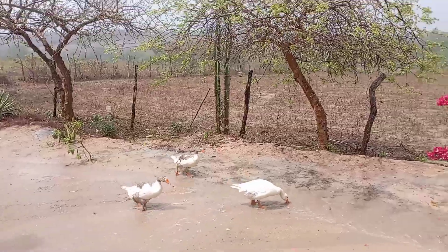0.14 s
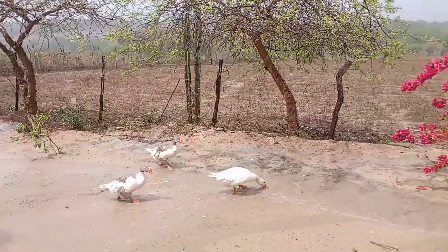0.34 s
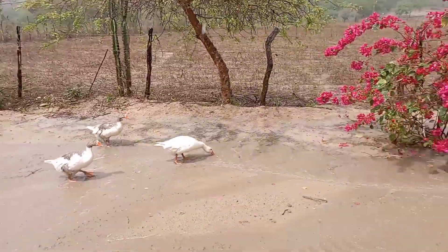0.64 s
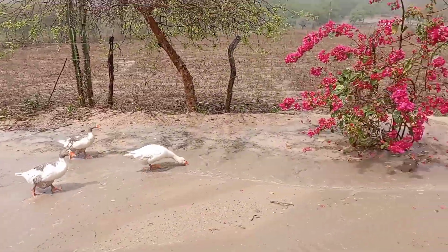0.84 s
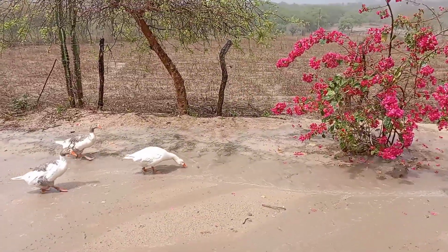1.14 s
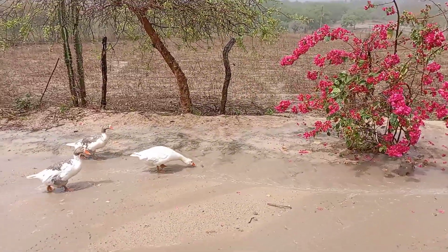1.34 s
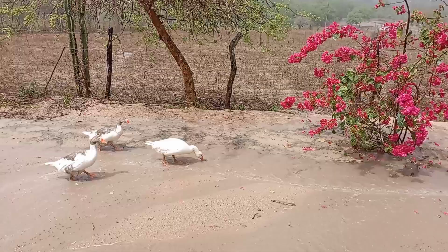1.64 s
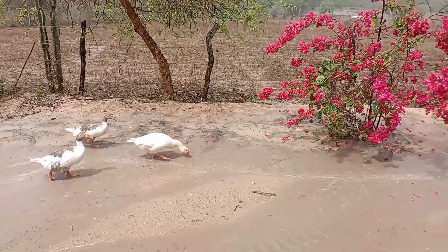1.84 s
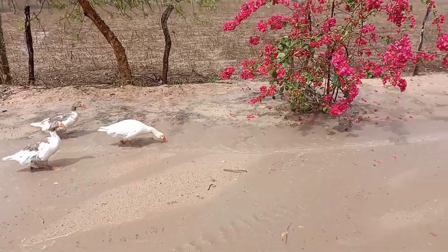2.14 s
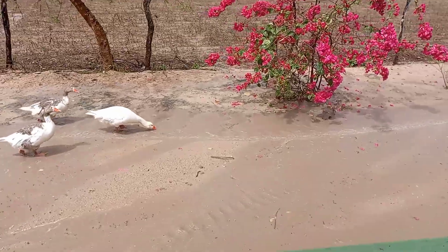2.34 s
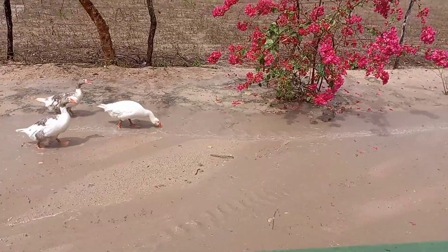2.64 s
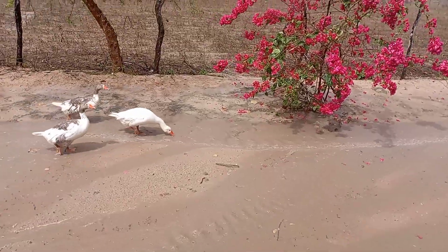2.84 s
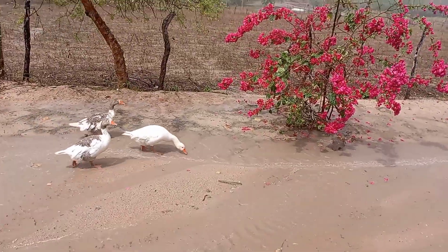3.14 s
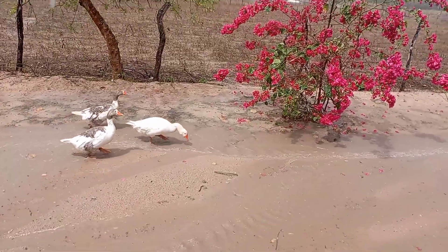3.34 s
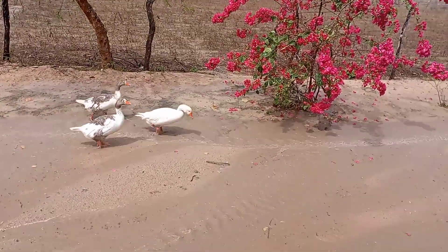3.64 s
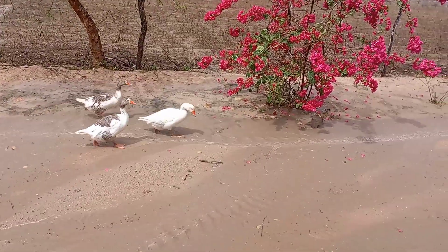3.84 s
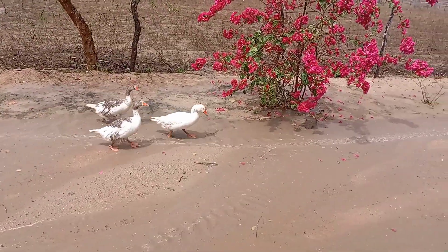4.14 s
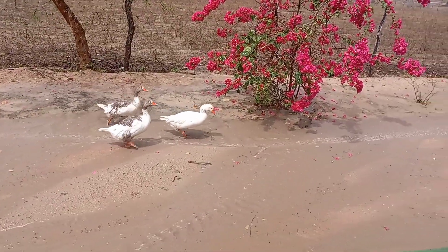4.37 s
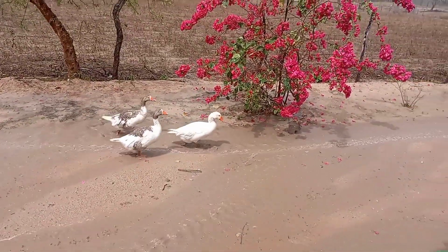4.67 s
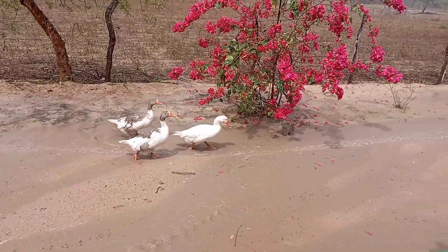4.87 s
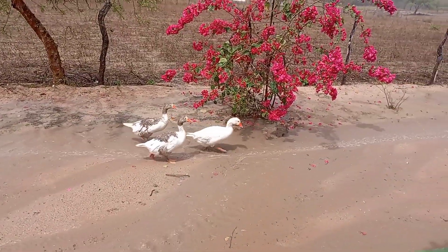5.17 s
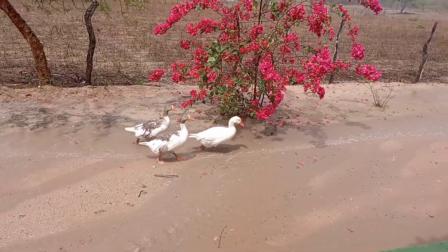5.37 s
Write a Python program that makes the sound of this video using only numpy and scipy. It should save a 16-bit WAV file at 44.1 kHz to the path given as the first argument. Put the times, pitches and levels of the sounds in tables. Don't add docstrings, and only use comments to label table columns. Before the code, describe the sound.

Fine, bright rain patter runs throughout, dotted with sharp ticks and little watery splashes. Beneath it lies a dull distant rumble and a slow engine putter that nearly sinks away, then quickens, grows barky and rough, swells to a peak past the middle, falls back and steadies. Thin bird whistles chirp briefly early on. Open outdoor space, stereo microphone, faint wall echoes on the engine.

```python
import sys
import numpy as np
from scipy import signal
from scipy.fft import rfft, irfft
from scipy.io import wavfile
from scipy.ndimage import uniform_filter1d

SR = 44100
rng = np.random.default_rng(int(sys.argv[2]) if len(sys.argv) > 2 else 0)


def waveform_to_disk(signal):
    frames = np.transpose(np.atleast_2d(signal))
    scaled = np.clip(frames, -1, 1) * 32767
    samples = np.round(scaled).astype(np.int16)
    wavfile.write(sys.argv[1], SR, samples)


def to_linear_factor(level_db):
    exponent = np.asarray(level_db, float) / 20
    return 10 ** exponent


N = 242991
TIME = np.arange(N) / SR
BINS = np.maximum(np.fft.rfftfreq(N, 1 / SR), 1)


def in_time(rows, s):
    at, *columns = np.transpose(rows)
    return [np.interp(s, at, c) for c in columns]


def at_hz(points, hz):
    point_hz, point_db = np.transpose(points)
    return np.interp(np.log(hz), np.log(point_hz), point_db)


def rms_one(x):
    return x / np.sqrt(np.mean(x ** 2) + 1e-20)


def drift(rate_hz):
    r = np.exp(-80 * np.pi * rate_hz / SR)
    noise = rng.standard_normal(N // 40 + 2002)
    slow = signal.lfilter([1], [1, -2 * r, r * r], noise)[2000:]
    return np.interp(np.arange(N) / 40, np.arange(len(slow)), rms_one(slow))


def add(track, s, grain):
    i = round(s * SR)
    part = grain[max(-i, 0):max(N - i, 0)]
    start = max(i, 0)
    track[start:start + len(part)] += part


def band(x, hz, octaves):
    edges_hz = np.clip(hz * 2.0 ** (np.array([-.5, .5]) * octaves), 20, .45 * SR)
    return signal.sosfilt(signal.butter(2, edges_hz, "band", fs=SR, output="sos"), x)


# (frequency [Hz], density [dB per Hz])
RUMBLE_SPECTRUM = [(25, -19), (45, -4), (70, 4), (110, 10.5), (200, -0.5), (350, 2), (500, -7.5),
                   (900, -41), (1500, -56)]


def far_rumble():
    mid, side = rfft(rng.standard_normal((2, N))) * to_linear_factor(at_hz(RUMBLE_SPECTRUM, BINS))
    apart = np.clip(BINS / 700, .6, 1)
    both = irfft(np.array([mid + apart * side, mid - apart * side]), N)
    return to_linear_factor(-47.5 + 1.55 * drift(0.92)) * rms_one(both)


# (time [s], level [dB])
RAIN_LEVEL = [(0, -42), (.47, -41.5), (.8, -43), (4.8, -42.5), (5.3, -41.5), (5.51, -42)]
# (frequency [Hz], density [dB per Hz])
HISS_SPECTRUM = [(290, -44), (500, -4.5), (740, -2.5), (1360, -5), (1640, -3.5), (2190, -2.5), (2610, -1.5),
                 (3750, -4), (5800, -0.5), (9630, 3), (12100, -4.5), (15100, -7.5), (16000, -20)]


def rain(patchy_db, grain_db, grain_share, per_s):
    size = to_linear_factor(grain_db * np.minimum(rng.exponential(1, N), 5)) * rng.choice([-1, 1], N)
    landed = rng.random(N) < per_s * to_linear_factor(5.0 * drift(18)) / SR
    ticks = rms_one(size * landed)
    ticks = np.array([ticks, np.roll(ticks, 11)])
    share = np.clip(grain_share, 0, 1)
    source = rfft(np.sqrt(1 - share) * rng.standard_normal((2, N)) + np.sqrt(share) * ticks)
    source = source * to_linear_factor(at_hz(HISS_SPECTRUM, BINS)) * (BINS > 300)
    together = 0.19 * drift(28.0) + 0.19 * drift(56)
    octave = np.log2(BINS / 250)
    out = 0
    for k in range(13):
        mask = np.cos(np.pi / 2 * np.clip(2 * octave - k, -1, 1)) ** 2
        own = 0.33 * drift(3.8) + 0.62 * drift(25.5)
        flicker_db = patchy_db * min(k / 9, 1) * (together + own)
        out = out + to_linear_factor(flicker_db) * irfft(source * mask, N)
    return to_linear_factor(in_time(RAIN_LEVEL, TIME)[0]) * rms_one(out)


# (time [s], peak [dB], centre [Hz])
SAND_DROPS = [(0.3327, -28, 8460), (.94, -32, 9300), (1.133, -30, 8650), (1.2927, -29, 8400),
              (1.5594, -32.5, 6140), (1.989, -38, 5750), (2.2468, -28, 8230), (2.383, -31.5, 7500),
              (2.428, -29, 10100), (2.4564, -33, 7700), (2.825, -33, 5600), (2.8395, -33, 6950),
              (2.9921, -36, 7710), (3.2398, -31.5, 6330), (3.27, -22, 7560), (3.5568, -35, 8350),
              (3.6706, -38.5, 5240), (3.8873, -25, 8800), (4.0002, -31, 5160), (4.2197, -35, 9400),
              (4.388, -31.5, 8600), (4.7007, -41, 9500), (4.765, -30, 9100), (5.151, -31, 8880),
              (5.2091, -34, 10200)]
# (time [s], peak [dB], centre [Hz], t60 [s])
WATER_SPATTERS = [(.3895, -29.5, 8250, 0.25), (.5013, -35, 8500, 0.23), (.7096, -32.5, 9800, .16),
                  (.8155, -34.5, 7400, .05), (.8594, -32, 9400, .062), (.9112, -35, 9100, .085),
                  (1.2448, -32.5, 10100, .14), (1.8632, -31.5, 6800, .051), (2.0764, -35.5, 9000, .19),
                  (2.6527, -32.5, 5500, 0.11), (2.7918, -33, 5800, 0.064), (2.9346, -37, 8200, 0.13),
                  (3.1015, -32, 5830, 0.11), (3.4176, -39, 6000, .057), (3.7528, -34, 6500, .19),
                  (3.9754, -39, 5500, 0.11), (5.0828, -34, 9800, 0.055), (5.3671, -36, 2960, 0.096)]
# (time [s], peak [dB], centre [Hz], t60 [s])
PUDDLE_SPLASHES = [(.4446, -40.5, 2470, 0.063), (.9095, -39.5, 4230, .18), (1.9478, -43, 2420, 0.14),
                   (2.1838, -47, 3340, .12), (2.6834, -41, 4000, .099), (3.006, -38.5, 2900, .08),
                   (3.081, -41.5, 3270, 0.21), (4.315, -41, 1940, 0.22), (4.3401, -41.5, 1950, 0.29),
                   (4.4918, -42, 3370, .078), (4.796, -41.5, 4700, 0.17), (4.979, -48, 3830, .12),
                   (5.1482, -35.5, 4270, 0.15), (5.2101, -40, 2960, .069), (5.3886, -41.5, 1340, 0.14)]


def drops(table, octaves, swell_s, spray_db):
    out = np.zeros((2, N))
    t = np.arange(int(.15 * SR)) / SR
    for s, db, hz, t60_s in table:
        noise, luck = rng.standard_normal((3, len(t))), rng.random(len(t))
        tick = noise[0] * t * to_linear_factor(-60 * t / .006)
        tick = band(band(tick, hz, 1.1), hz, 1.1)
        tick = tick / np.abs(tick).max()
        bursts = uniform_filter1d(1. * (luck < .004), size=40) * 40
        droplets = (.3 * noise[0] + noise[1:]) * (.6 + .9 * bursts)
        shape = (1 - np.exp(-t / swell_s)) * to_linear_factor(-60 * t / np.clip(1.62 * t60_s, .05, .35))
        spray = rms_one(band(droplets, hz, octaves)) * shape / shape.max() / 3
        for side, late_s in enumerate([0, .00025]):
            add(out[side], s + late_s, to_linear_factor(db + 3.5) * (tick + to_linear_factor(spray_db) * spray[side]))
    return out


# (time [s], length [s], start [Hz], end [Hz], level [dB])
BIRD_SQUEAKS = [
    (1.355, 0.032, 5280, 5250, -36.5),
    (1.41, .02, 5850, 5500, -41),
    (1.417, 0.052, 5480, 5470, -38.5),
    (1.468, .05, 5700, 5480, -43),
    (1.535, 0.069, 5800, 5460, -37),
    (1.6, .02, 5650, 5800, -58),
    (1.666, 0.067, 5750, 5900, -41),
    (1.77, 0.068, 5850, 5700, -48),
    (1.89, 0.036, 5800, 5900, -44),
    (1.982, 0.041, 5750, 5800, -43),
]


def bird():
    out = np.zeros(N)
    for s, length_s, start_hz, end_hz, db in BIRD_SQUEAKS:
        n = int(length_s * SR)
        hz = np.linspace(start_hz, end_hz, n) + 900.0 * uniform_filter1d(rng.standard_normal(n), size=90)
        rough_db = 20 * uniform_filter1d(rng.standard_normal(n), size=60)
        whistle = np.sin(2 * np.pi * np.cumsum(hz) / SR)
        add(out, s, to_linear_factor(db - 5.0 + rough_db) * np.hanning(n) ** 0.63 * whistle)
    return out


# (frequency [Hz], left minus right [dB])
PORT_BALANCE = [(60, 1.0), (110, 1.5), (200, -1.0), (380, -29), (700, 1), (1290, -5), (2380, -7.5),
                (4400, -12.5), (8120, -7.5), (15000, 1.5)]


def ports(x):
    half_db = at_hz(PORT_BALANCE, BINS) / 2
    return irfft(rfft(x) * to_linear_factor(np.array([half_db, -half_db])), N)


PUFF_PEAK_S = .035


def puff(hz, rise_ms, sag):
    t = np.arange(int(.09 * SR)) / SR - PUFF_PEAK_S
    u = np.maximum(1 + t * 650 / rise_ms, 0)
    wave = (u * np.exp(1 - u)) ** 7 * np.sin(2 * np.pi * hz * t * (1 - sag * t))
    return wave / np.sqrt(np.sum(wave ** 2))


# (time [s], level [dB])
THROTTLE = [(0, -45.5), (.5, -52.5), (1.4, -58), (1.52, -44.5), (1.88, -47), (2.18, -43.5), (2.36, -37),
            (2.56, -34.5), (3.28, -30.5), (3.41, -24.5), (3.58, -25), (3.755, -30.5), (3.79, -35),
            (4.08, -34), (4.3, -36.5), (4.45, -30), (4.64, -30), (5.51, -31.5)]
# (time [s], thump carried by the walls [dB], left minus right [dB])
WAY_ROUND = [(0, -42, -2), (1.15, -44.5, 0), (1.42, -47.5, 0), (1.52, -39.5, 2), (2.17, -40, 0.5),
             (2.32, -54, 0), (2.6, -48, 2), (3.28, -44, -1), (3.55, -36.5, -0.5), (3.66, -52, -1.5),
             (3.8, -40.5, -0.5), (4.27, -45, -.5), (4.33, -48, -1), (4.58, -44, -1), (4.68, -42, -1.5),
             (5.51, -43.5, -2)]
# (time [s], loss of bark [dB], loss of thump [dB])
WEAK_FIRINGS = [
    (.18, 3, 3),
    (.62, 8, 12),
    (1.225, 6, 13),
    (2.26, 10.5, -5.5),
    (2.5, 3.5, -9),
    (4.17, 5.5, 1),
    (4.56, 11, -0.5),
]
# (time [s], bark [Hz], rasp [Hz], treble lift [dB])
PIPE_NOTES = [(0, 156, 366, -1.5), (1.45, 177, 364, 3.5), (1.52, 211, 337, 1.5), (2.3, 225, 393, -4),
              (3.3, 218, 388.3, -2), (3.8, 211, 391, -0.5), (4.25, 197, 357, -4.5), (4.4, 206, 366, 0.5),
              (5.51, 193.6, 355, 4)]


def controls(s):
    thump_db, pan_db = in_time(WAY_ROUND, s)
    at, bark_loss_db, thump_loss_db = np.transpose(WEAK_FIRINGS)
    near = np.exp(-.5 * ((s[:, None] - at) / .027) ** 2)
    thump_db = thump_db - near @ thump_loss_db
    bark_db = in_time(THROTTLE, s)[0] - near @ bark_loss_db
    swing_db = bark_db + 35
    lift_db = in_time(PIPE_NOTES, s)[2]
    rasp_db = -44.5 + 0.87 * swing_db + 0.79 * lift_db
    edge_db = -55.5 + .74 * swing_db + lift_db
    return np.array([thump_db, bark_db, rasp_db, edge_db, pan_db])


# (time [s], rate [firings per s])
FIRING_RATE = [(0.0, 18.78), (0.47, 21.14), (1.2, 19.36), (1.3, 14.03), (1.52, 26.12), (2.31, 25.15),
               (2.45, 27.87), (2.62, 25.63), (3.39, 29.63), (3.63, 32.76), (3.92, 28.07), (4.27, 22.72),
               (4.39, 27.62), (4.58, 22.15), (4.73, 27.49), (4.87, 25.82), (5.23, 26.11), (5.51, 27.48)]
# (frequency [Hz], level [dB], lag [ms])
PIPE_EDGE = [
    (522, -5, 2.51),
    (587, -12.5, 3.86),
    (707, -10.5, 8.24),
]
# (delay [ms], level [dB])
WALL_ECHOES = [(17.19, -13.5), (24.6, -28), (41.35, -14), (11.73, -29), (62.86, -14)]


def engine():
    rate = in_time(FIRING_RATE, TIME)[0]
    turns = .476 + np.cumsum(rate) / SR
    fired = np.interp(np.arange(1, turns[-1]), turns, TIME)
    energy_db = 10 * np.log10(np.gradient(fired) * SR)
    levels = controls(fired)
    thump_db, bark_db, rasp_db, edge_db = levels[:4] + energy_db
    bark_hz, rasp_hz, lift_db = in_time(PIPE_NOTES, fired)

    open_throttle = np.clip((levels[1] + 33.5) / 2, 0, 1)
    thump_hz = 88.6 + 3.3 * np.maximum(in_time(FIRING_RATE, fired)[0] - 26, 0) + 40 * open_throttle
    lag_ms = np.where(fired < 2.3, 4.5, 13.1)
    rasp_ms = np.clip(9.6 - 1.67 * lift_db, 3, 20)
    bark_sag = 3.2 + 1.9 * np.maximum(lift_db, 0)

    luck_db = rng.standard_normal((len(fired), 6)) * [.8, .6, .9, 1, 1, 1]
    low, pipe, crack = np.zeros((3, N))
    for k, s in enumerate(fired - PUFF_PEAK_S):
        own_db = luck_db[k]
        thump = puff(thump_hz[k], 18.5, 3.1)
        add(low, s + lag_ms[k] / 1e3, to_linear_factor(thump_db[k] + 1.5 + own_db[0]) * thump)
        add(pipe, s, to_linear_factor(bark_db[k] + own_db[1]) * puff(bark_hz[k], 8.8, bark_sag[k]))
        add(pipe, s - .0006, to_linear_factor(rasp_db[k] + own_db[2]) * puff(rasp_hz[k], rasp_ms[k], 3.4))
        for (hz, db, ms), mode_db in zip(PIPE_EDGE, own_db[3:]):
            add(pipe, s + ms / 1e3, to_linear_factor(edge_db[k] + db + mode_db) * puff(hz, 10.4, 0.78))
        add(crack, s, to_linear_factor(edge_db[k] - 9.5) * np.abs(puff(bark_hz[k] / 8, 30.0, 0)))

    slow_thump_db, _, slow_rasp_db, _, pan_db = controls(TIME[::64])[:, np.arange(N) // 64]
    turbulence = rms_one(band(rng.standard_normal(N), 670, 2.23))
    scatter = rms_one(band(rng.standard_normal(N), 349, 0.81))
    pipe = pipe + crack * turbulence + to_linear_factor(slow_rasp_db - 9.5) * scatter
    hum_db = slow_thump_db - 21.5 + 2.5 * (rate - 24.5) - in_time(PIPE_NOTES, TIME)[2]
    low = low + to_linear_factor(hum_db) * np.sin(4 * np.pi * turns)

    low = np.array([low, np.roll(low, 36)])
    sides = low * to_linear_factor([[.4], [-.4]]) + pipe * to_linear_factor(np.array([pan_db / 2, -pan_db / 2]))
    for ms, db in WALL_ECHOES:
        for side, skew in enumerate([.965, 1.04]):
            d = int(skew * ms * SR / 1000)
            sides[side, d:] += to_linear_factor(db) * pipe[:-d]
    return sides


def scene():
    wet = rain(patchy_db=2.5, grain_db=7.5, grain_share=0.066, per_s=1500)
    sand = [(*row, .09) for row in SAND_DROPS]
    wet = wet + drops(sand, octaves=0.66, swell_s=0.0062, spray_db=-7.5)
    wet = wet + drops(WATER_SPATTERS, octaves=0.77, swell_s=0.006, spray_db=-2.5)
    wet = wet + drops(PUDDLE_SPLASHES, octaves=1.74, swell_s=0.0028, spray_db=0.0)
    return ports(wet + bird()) + engine() + far_rumble()


def top_cut(x):
    return signal.sosfilt(signal.butter(12, 15830, fs=SR, output="sos"), x)


def record(dry):
    return top_cut(dry)


dry = scene()
out = record(dry)
waveform_to_disk(out)
```